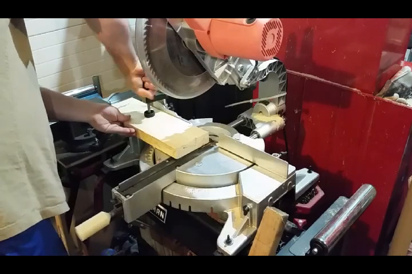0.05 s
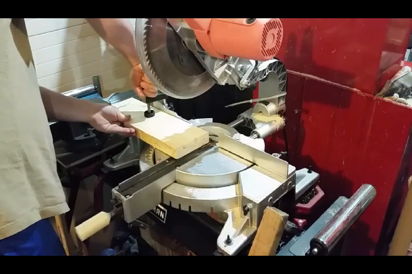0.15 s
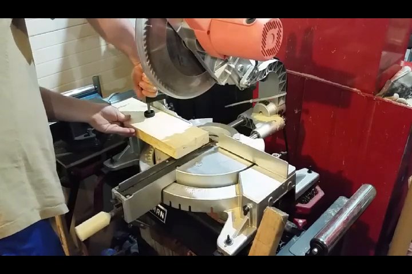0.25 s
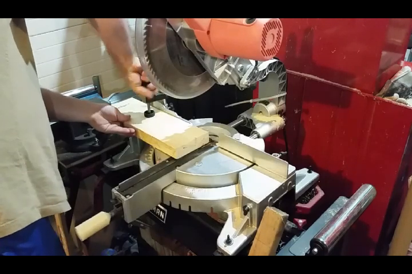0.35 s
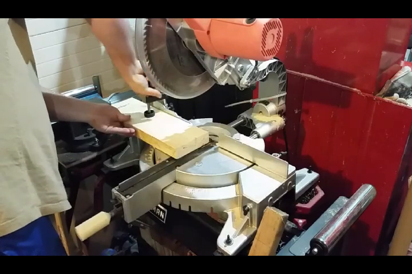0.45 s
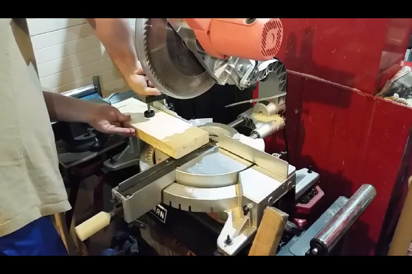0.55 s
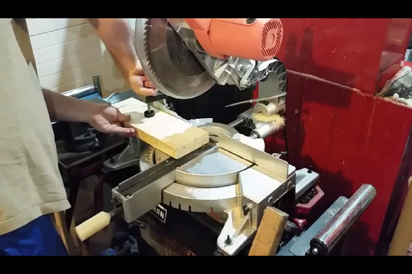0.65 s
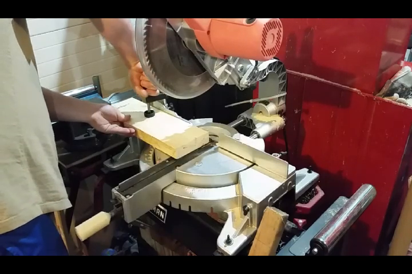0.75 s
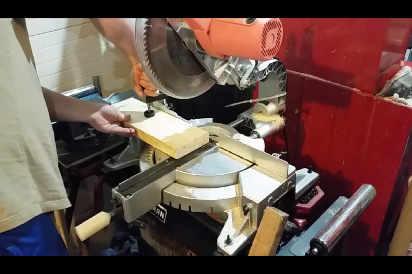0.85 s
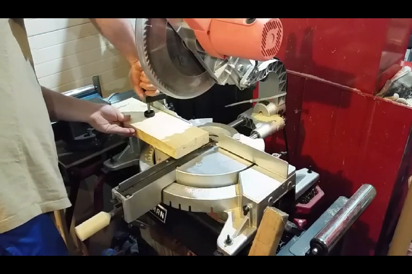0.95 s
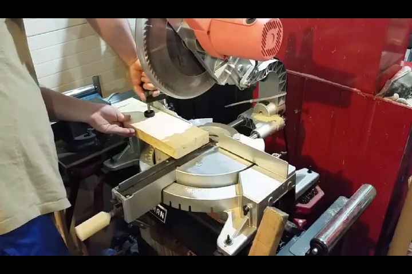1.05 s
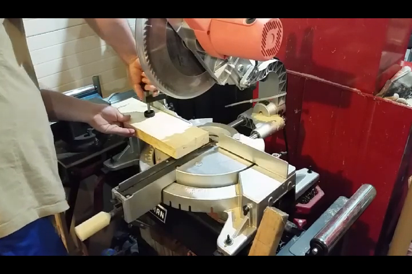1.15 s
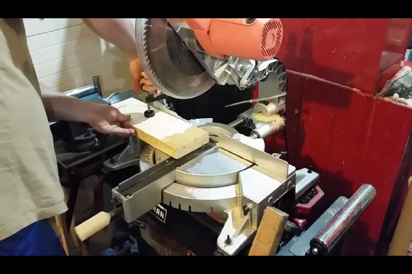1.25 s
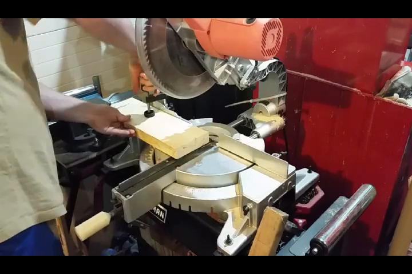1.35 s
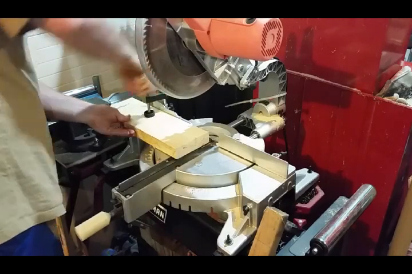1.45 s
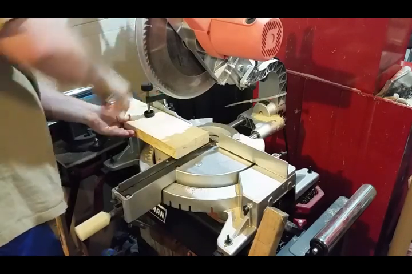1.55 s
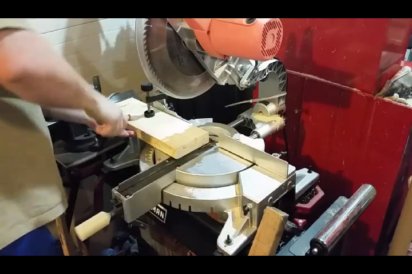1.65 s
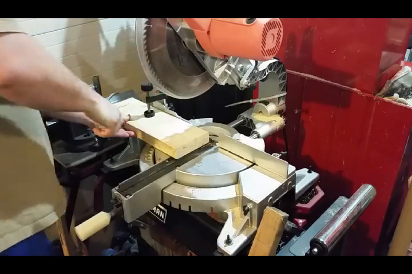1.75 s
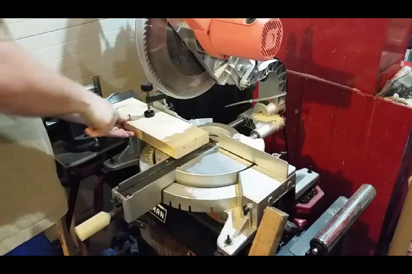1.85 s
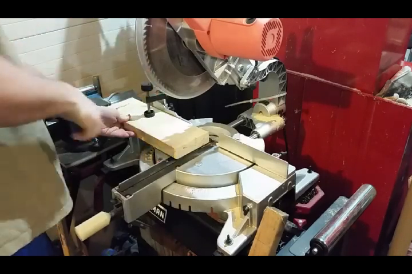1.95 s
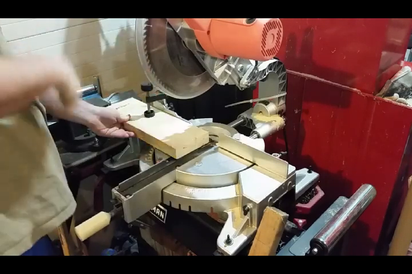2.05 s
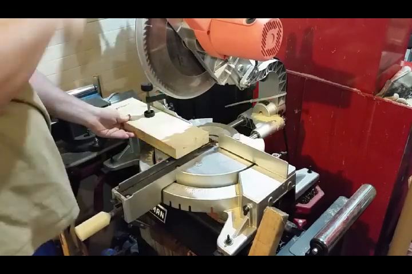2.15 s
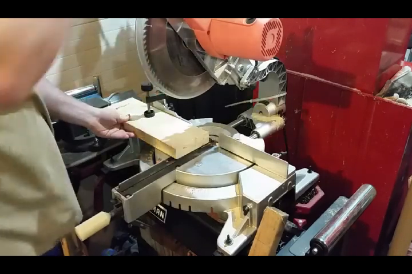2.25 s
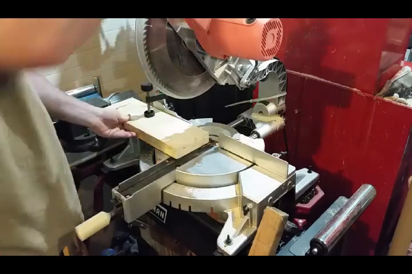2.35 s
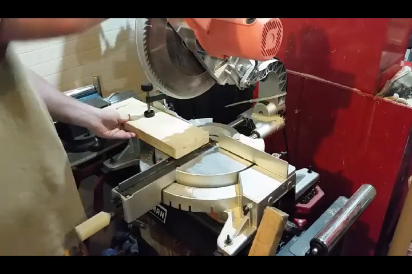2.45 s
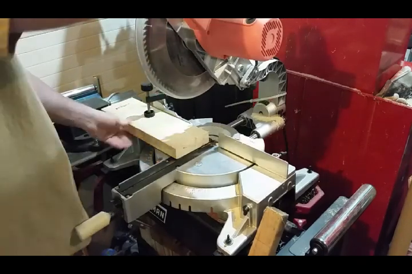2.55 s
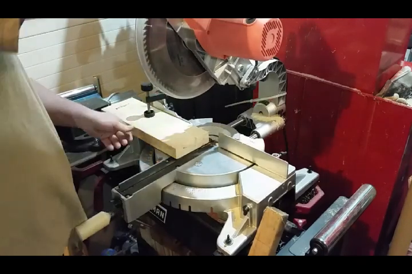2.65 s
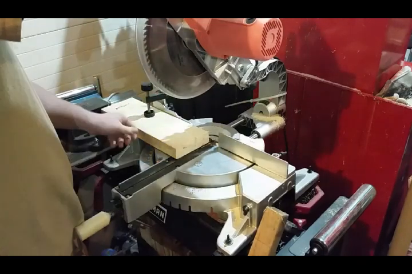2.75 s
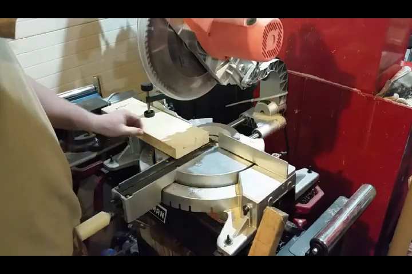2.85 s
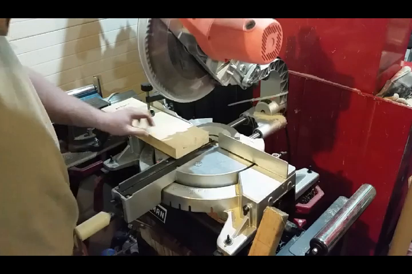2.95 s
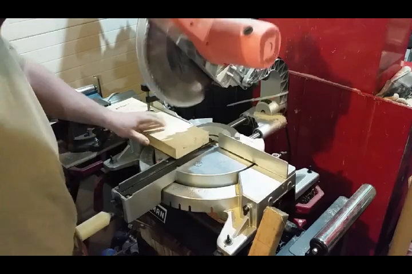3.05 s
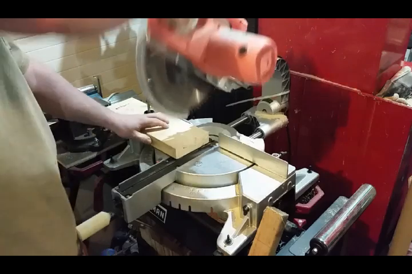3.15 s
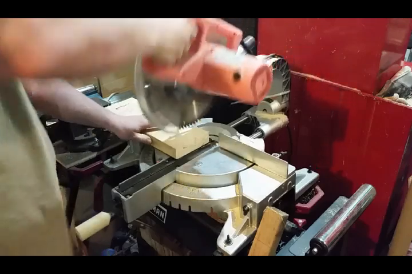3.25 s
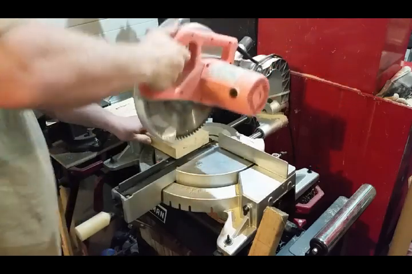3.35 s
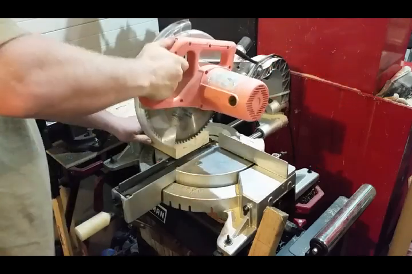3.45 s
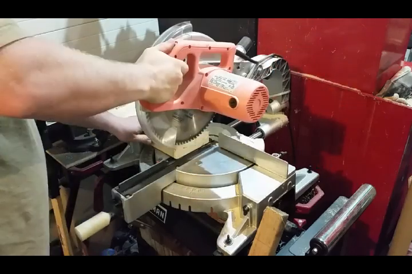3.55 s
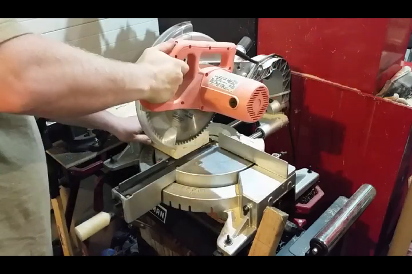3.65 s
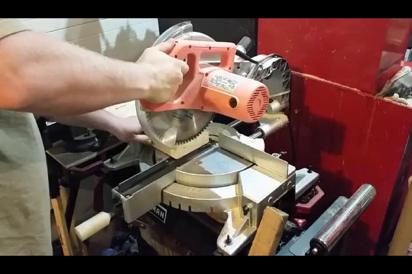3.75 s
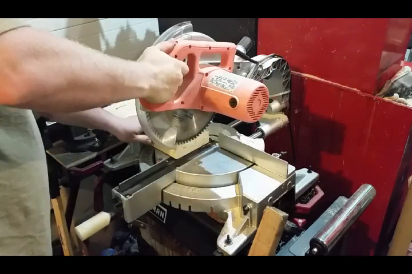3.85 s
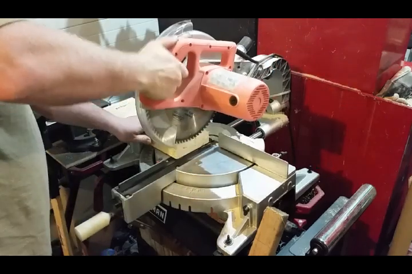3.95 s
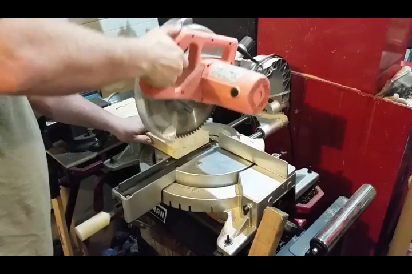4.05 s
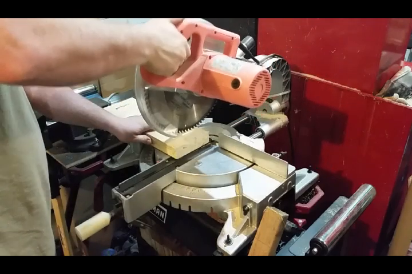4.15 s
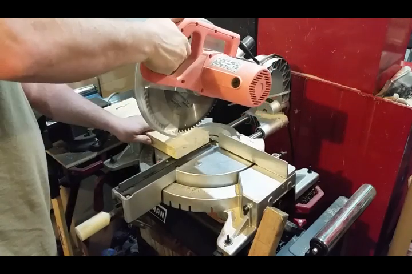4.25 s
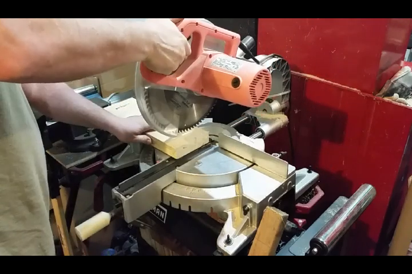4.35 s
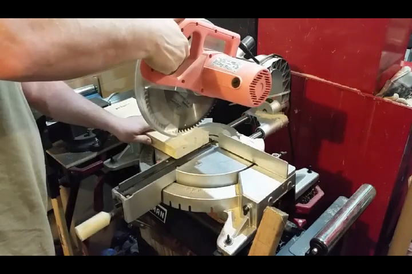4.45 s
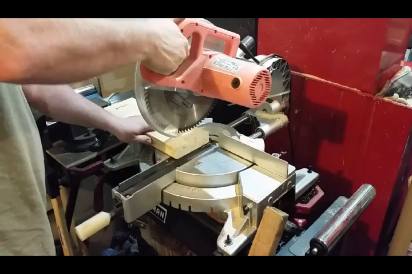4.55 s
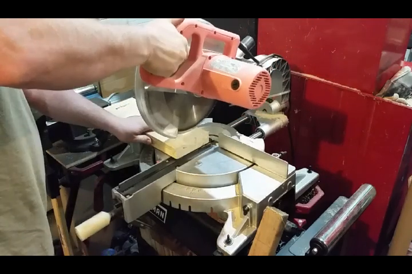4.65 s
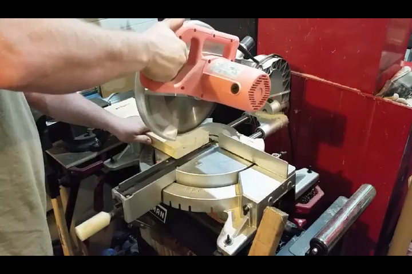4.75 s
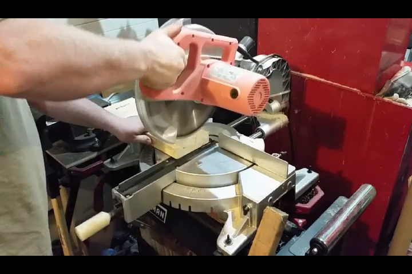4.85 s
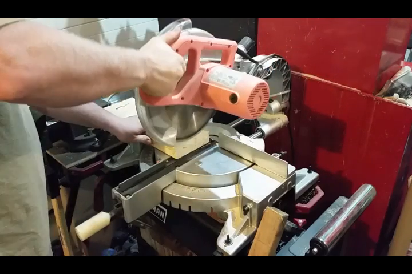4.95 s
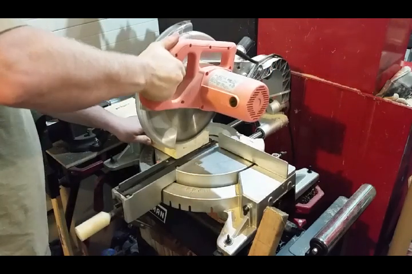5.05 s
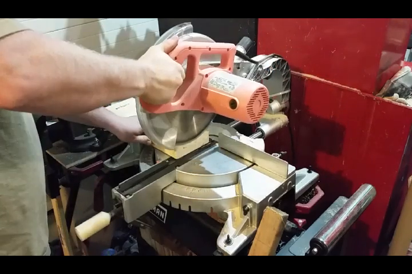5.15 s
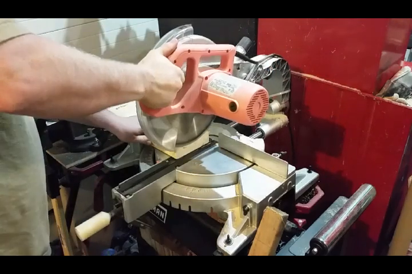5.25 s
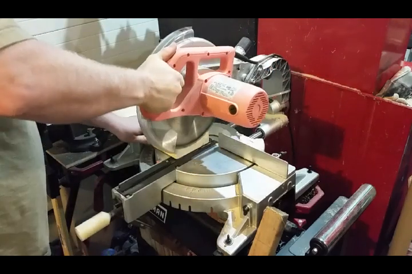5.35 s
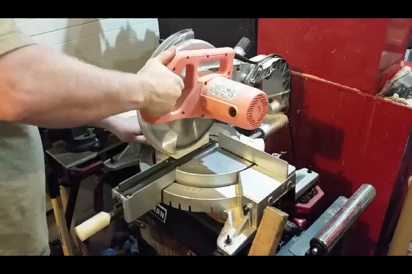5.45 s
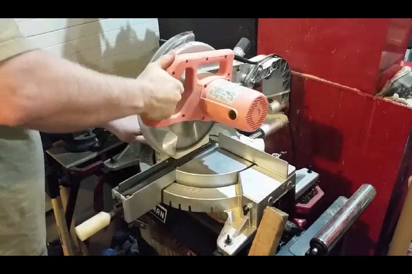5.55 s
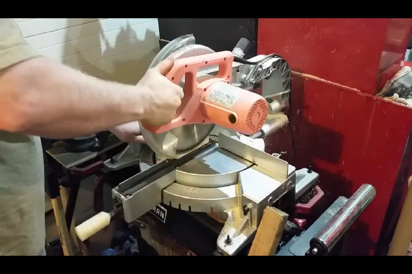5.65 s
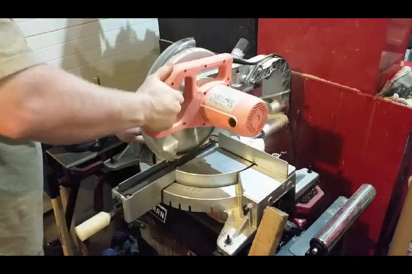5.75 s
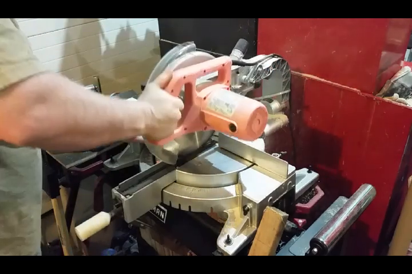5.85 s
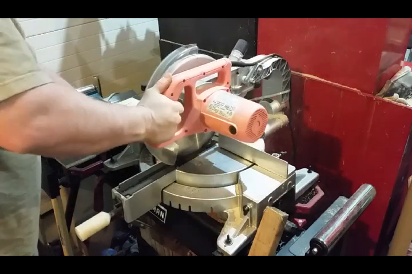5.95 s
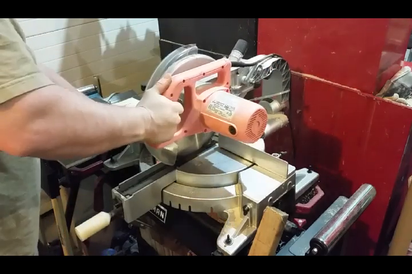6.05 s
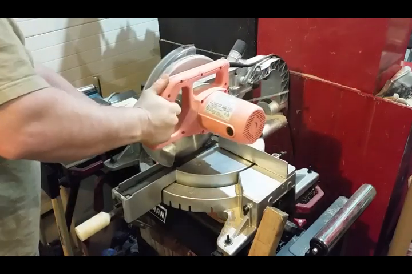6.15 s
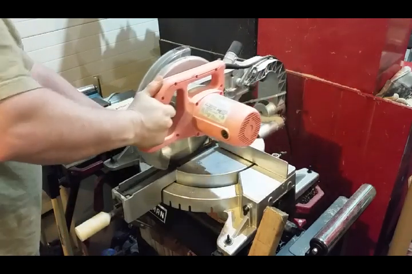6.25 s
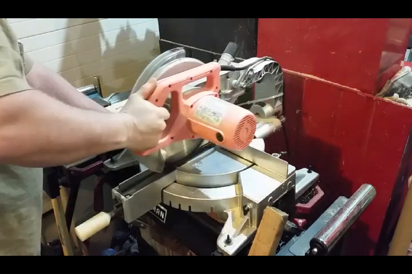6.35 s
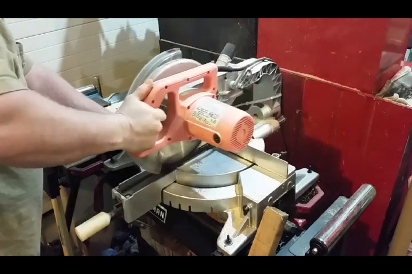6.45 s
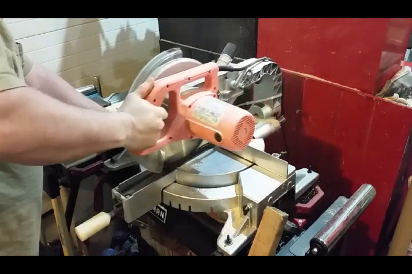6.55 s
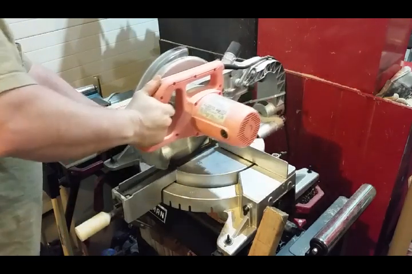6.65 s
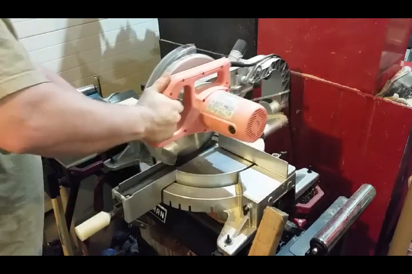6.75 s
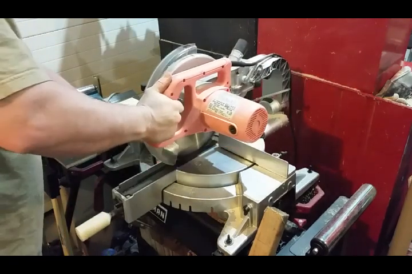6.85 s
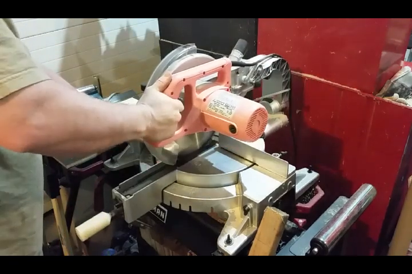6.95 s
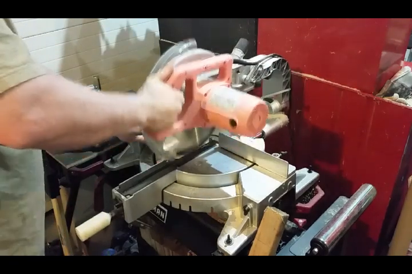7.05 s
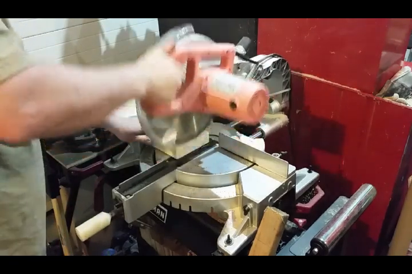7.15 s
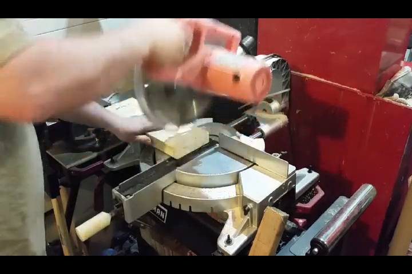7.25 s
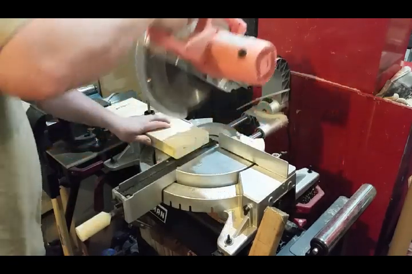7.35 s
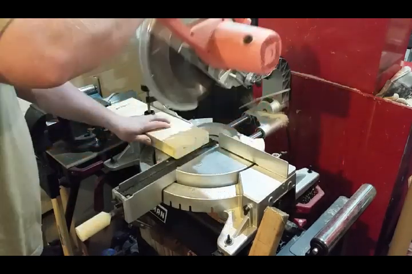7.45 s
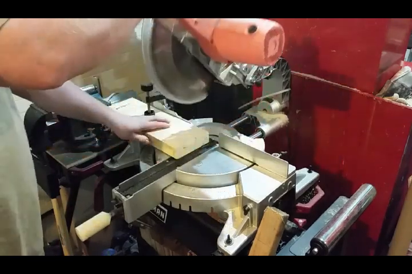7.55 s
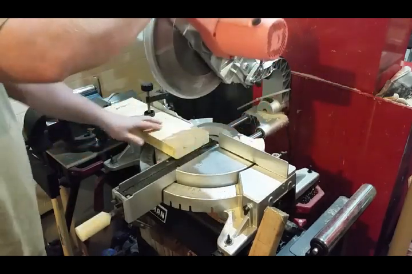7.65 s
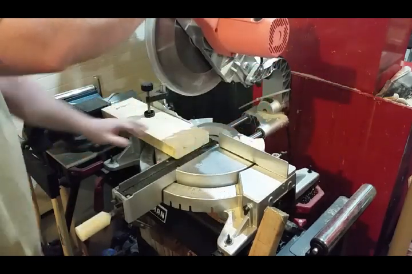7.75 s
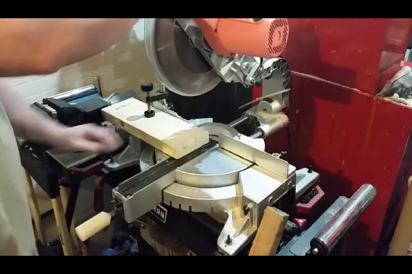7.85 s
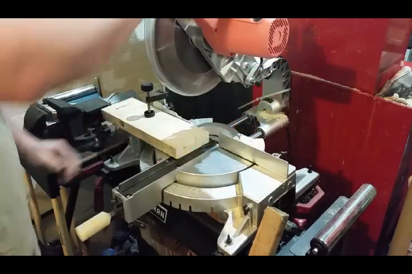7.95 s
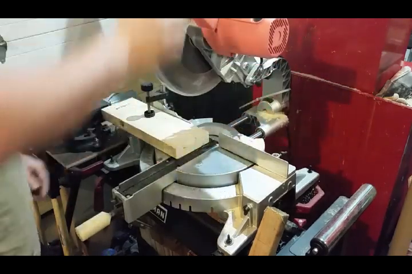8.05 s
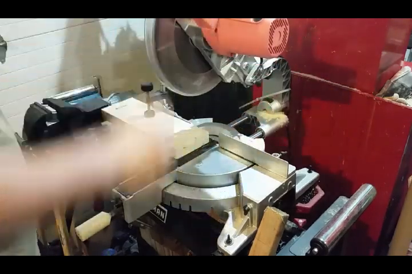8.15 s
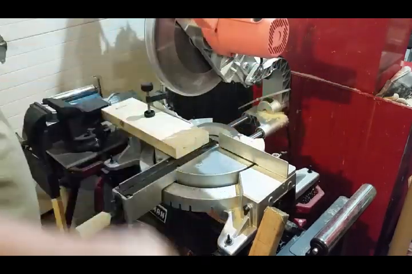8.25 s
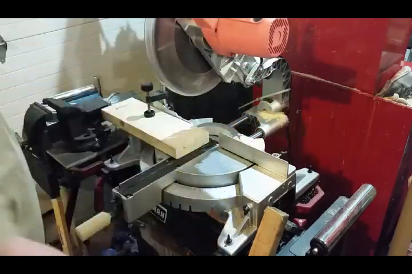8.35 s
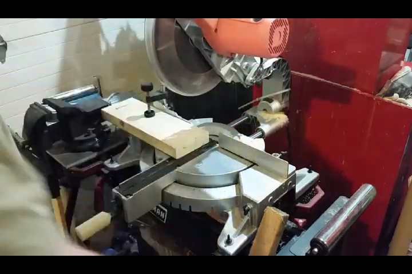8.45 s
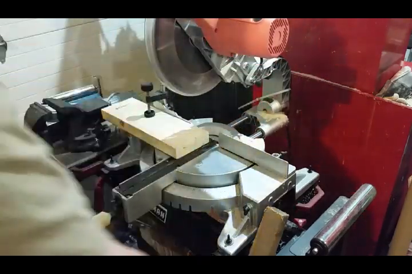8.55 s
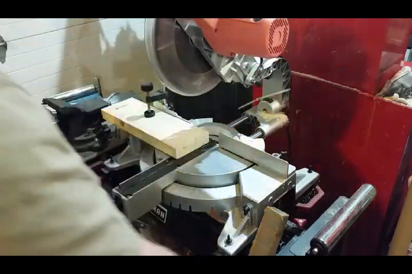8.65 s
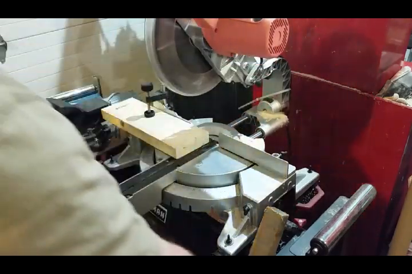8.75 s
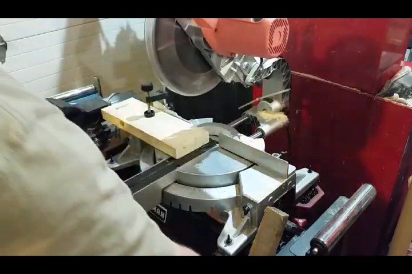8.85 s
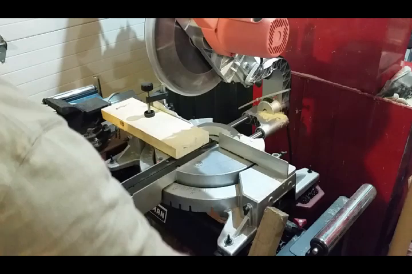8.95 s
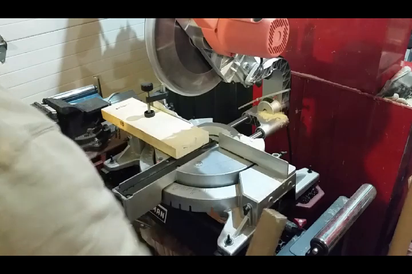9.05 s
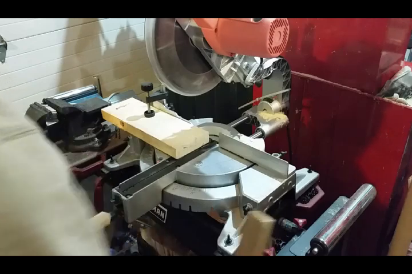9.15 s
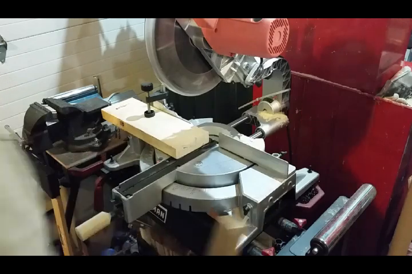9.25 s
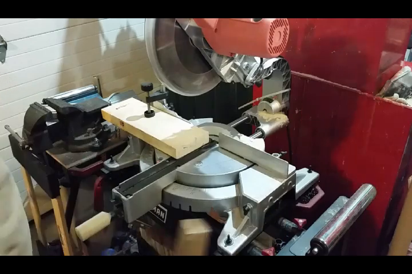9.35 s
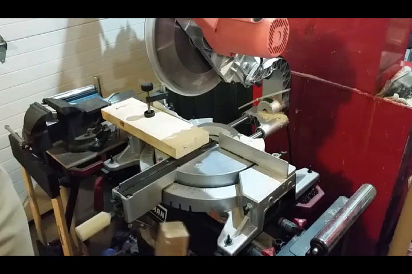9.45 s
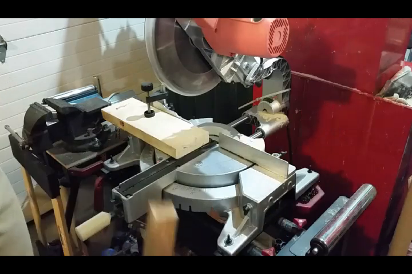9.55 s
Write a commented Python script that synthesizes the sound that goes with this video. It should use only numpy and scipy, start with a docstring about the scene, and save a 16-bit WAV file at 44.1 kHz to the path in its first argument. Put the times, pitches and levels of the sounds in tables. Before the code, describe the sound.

In a quiet small workshop, a sharp clack is followed by soft clicks and rubbing as a miter saw's arm is lowered. The motor jolts on and whines up with rushing air. The blade cuts a wooden board in two pushes, hissing and briefly ringing. Switched off, the saw gives one knock and winds down with a falling whine and slowing rattle, heard from nearby.

```python
"""Miter saw in a small workshop.

A board shifts, a clack sounds, then the sprung arm swings down and eases back, clicking and rubbing.
The motor jolts on and spins up; its speed drives gear whine, howl, rattle and rushing air.
The blade grazes the wood, cuts in two pushes and grazes it again: chips hiss, tips and plate ring.
Switched off, the gears sing a falling whine and rattle ever more slowly in their housing."""
import sys
import numpy as np
from scipy import signal
from scipy.fft import rfft, irfft, next_fast_len
from scipy.io import wavfile
from scipy.ndimage import uniform_filter1d

SR = 44100
rng = np.random.default_rng(int(sys.argv[2]) if len(sys.argv) > 2 else 0)


def transcribe(u):
    """Save the signal u as a 16-bit wav file named by the first command-line argument.

    u: samples, shape (n,) or (channels, n), limited to [-1, 1]; the rate is SR.
    q: integer samples, one column per channel.
    """
    v = np.clip(np.atleast_2d(u).T, -1, 1)
    q = np.round(v * 32767).astype(np.int16)
    wavfile.write(sys.argv[1], SR, q)


N = 422841
T = np.arange(N) / SR
HZ = np.fft.rfftfreq(N, 1 / SR)
ON_S, OFF_S = 4.686, 7.391  # trigger pulled, released
TOP_HZ = 2795  # tooth rate the gears tend to under power


def amp(db):
    """Decibels to gain."""
    return 10 ** (np.asarray(db) / 20)


def unit(x):
    """Scale to rms 1."""
    return x / np.sqrt(np.mean(x ** 2) + 1e-20)


def curve_at(points, hz):
    """Interpolate (Hz, value) points over log frequency."""
    point_hz, value = np.transpose(points)
    return np.interp(np.log(hz + 1), np.log(point_hz + 1), value)


# Bands that set the noise level of rattle, air and chips. Each row: low edge in Hz, high edge in Hz.
LEVEL_BANDS = [(280, 520), (4000, 9000), (11500, 14500)]
RATTLE_BAND, AIR_BAND, CHIP_BAND = LEVEL_BANDS

def noise(spectrum, band_hz=(0, SR)):
    """Coloured noise with rms 1 inside the band."""
    bins = rfft(rng.standard_normal(N)) * amp(curve_at(spectrum, HZ))
    in_band = (HZ >= band_hz[0]) * (HZ <= band_hz[1])
    return irfft(bins, N) / np.std(irfft(bins * in_band, N))


def drift(hz):
    """Smooth random motion of rms 1, up to about hz."""
    return unit(irfft(rfft(rng.standard_normal(N)) / (1 + (HZ / hz) ** 4), N))


def stroke(start_s, end_s, db, rise_db_per_s, fall_db_per_s):
    """Envelope that holds db from start to end and slopes away on both sides."""
    drop_db = rise_db_per_s * np.maximum(start_s - T, 0) + fall_db_per_s * np.maximum(T - end_s, 0)
    return amp(db - np.minimum(drop_db, 200))


def decays(blows, t60_s):
    """Envelope of dying blows, summed in power."""
    return np.sqrt(sum((T >= s) * amp(db - 60 * np.maximum(T - s, 0) / t60_s) ** 2 for s, db in blows))


# Background spectrum. Each row: frequency in Hz, relative density in dB.
ROOM_SPECTRUM = [(25, -4), (58, -8), (95, -9), (155, -1), (180, -10), (260, -15), (700, -27), (3400, -46.5),
                 (5000, -29), (6300, -51.5)]

def room_tone(level_db=-66.5):
    """Faint, steady, mostly low noise."""
    return amp(level_db) * noise(ROOM_SPECTRUM)


# Gear housing resonances. Each row: centre in Hz, width in Hz, lift in dB.
HOUSING_MODES = [(370.46, 59.5, 13), (810.5, 63.6, 9.5), (1410.7, 33, 8), (2425, 90, 10.5), (2982, 103, 8),
                 (4110, 40, 8), (6320, 1368, 10)]

def housing(x):
    """The cast housing lifts whatever falls on its resonances."""
    size = next_fast_len(N + SR)
    bin_hz = np.fft.rfftfreq(size, 1 / SR)
    lift = sum((amp(db) - 1) / (1 + 2j * (bin_hz - hz) / width_hz) for hz, width_hz, db in HOUSING_MODES)
    return irfft(rfft(x, size) * (1 + lift), size)[:N]


# Friction spectra by direction. Each row: frequency in Hz, relative density in dB.
RUB_DOWN_SPECTRUM = [(40, -7.5), (180, -1), (260, -5), (600, -9.5), (1150, -1.5), (2500, -12),
                     (3500, -15.5), (6200, -29.5), (9500, -43), (14000, -28.5)]
RUB_UP_SPECTRUM = [(240, -12.5), (640, -17), (1440, -1), (1960, -8), (2740, -4.5), (5200, -23),
                   (9700, -45.5), (14500, -39)]
# Board and arm moves. Each row: start in seconds, end in seconds, relative level in dB,
# rise in dB/s, fall in dB/s, direction.
RUB_STROKES = [(0.298, 0.513, -74.5, 87.5, 190, "down"), (2.934, 2.98, -68, 114.5, 203.5, "down"),
               (2.989, 3.805, -46.5, 1500, 230, "down"), (3.254, 3.298, -32, 114, 67.5, "down"),
               (4.22, 4.288, -36.5, 179.5, 288.5, "up")]

def rubs(gain_db=-3.0, grain_db=1.4):
    """The board shifts, the arm is lowered and eased back; friction sounds through the housing."""
    friction = {"down": unit(housing(noise(RUB_DOWN_SPECTRUM))),
                "up": unit(housing(noise(RUB_UP_SPECTRUM)))}
    rubbing = sum(stroke(*shape) * friction[direction] for *shape, direction in RUB_STROKES)
    return rubbing * amp(gain_db + grain_db * drift(104))


# Clack blows. Each row: start in seconds, level in dB.
CLACK_BLOWS = [(.8845, -33.5), (.902, -37)]
# Clack spectrum. Each row: frequency in Hz, relative density in dB.
CLACK_SPECTRUM = [(150, -23.5), (500, -1), (900, 2.5), (1950, -8), (4600, -4.5), (5680, 2.5), (7000, -9),
                  (14500, -11)]

def clack():
    """Two blows in quick succession, heard as one sharp clack."""
    return decays(CLACK_BLOWS, t60_s=0.307) * noise(CLACK_SPECTRUM)


# Guard clicks and knocks. Each row: start in seconds, relative level in dB.
GUARD_BLOWS = [(2.993, -39), (3.04, -40.5), (3.575, -36.5), (3.672, -36.5), (3.719, -34.5), (3.982, -56),
               (4.095, -57), (4.115, -51), (7.8, -14)]
# Click spectrum. Each row: frequency in Hz, relative density in dB.
CLICK_SPECTRUM = [(40, -40), (150, -18), (400, -6), (1250, 2), (4000, -13.5), (14000, -35)]

def guard_clicks():
    """The guard and its linkage knock, ringing the housing."""
    return housing(decays(GUARD_BLOWS, t60_s=0.0317) * noise(CLICK_SPECTRUM))


# Mains hum partials. Each row: frequency in Hz, relative level in dB.
HUM_PARTIALS = [(120, 8.5), (360, 8.5), (600, -15.5)]
# Starting jolt spectrum. Each row: frequency in Hz, relative density in dB.
JOLT_SPECTRUM = [(30, -40.5), (70, -11.5), (220, -7), (350, -4), (1500, -5), (1950, -10), (2450, -3.5),
                 (3100, -34.5), (14000, -31)]

def inrush(buzz_depth=0.19, attack_s=0.0228, hold_s=0.215, jolt_db=-24.5, hum_db=-26,
           jolt_fall_db_per_s=28, hum_fall_db_per_s=38):
    """Starting current shakes the saw at twice the mains frequency, holds briefly and falls away."""
    hum = unit(sum(amp(db) * np.sin(2 * np.pi * (hz * T + rng.random())) for hz, db in HUM_PARTIALS))
    buzz_hz = HUM_PARTIALS[0][0]
    jolt = noise(JOLT_SPECTRUM) * (1 + buzz_depth * np.sin(2 * np.pi * buzz_hz * T))
    falling_s = np.maximum(T - ON_S - hold_s, 0)
    jolt *= amp(jolt_db - jolt_fall_db_per_s * falling_s)
    hum *= amp(hum_db - hum_fall_db_per_s * falling_s)
    return np.clip((T - ON_S) / attack_s, 0, 1) * (jolt + hum)


def powered(switch_s=0.012):
    """1 while the trigger is held, else 0, with short ramps."""
    return np.clip((T - ON_S) / switch_s, 0, 1) * np.clip((OFF_S - T) / switch_s + 1, 0, 1)


def tooth_rate_hz(half_speed_s=0.34, sag=0.2, inertia_s=0.8, friction_s=2.697, drag_hz=679.35):
    """The motor spins up and sags under load; once off, friction and, above drag_hz, mainly air brake it."""
    run_s = np.clip(T - ON_S, 1e-3, OFF_S - ON_S)
    pole = np.exp(-1 / (inertia_s * SR))
    lagged_bite = signal.lfilter([1 - pole], [1, -pole], bite())
    load = np.interp(ON_S + run_s, T, lagged_bite)
    driven_hz = TOP_HZ * run_s / (run_s + half_speed_s) * (1 - sag * load)
    slowing = np.exp(np.maximum(T - OFF_S, 0) / friction_s)
    return 1 / ((1 / driven_hz + 1 / drag_hz) * slowing - 1 / drag_hz)


def torque(tooth_hz):
    """0 to 1: the motor pulls hardest at rest and eases toward top speed."""
    return powered() * (1 - tooth_hz / TOP_HZ)


# Gear mesh partials. Each row: multiple of the tooth rate, relative level in dB.
MESH_PARTIALS = [(1, 0.5), (2, 0), (3, -2.5), (4, 3), (5, -4.5), (6, -12), (8, -12.5)]

def gear_whine(tooth_hz, pinion_teeth=7, flutter=0.004, roughness=0.45, swell_db=0.6, runout=0.6,
               shaft_db=-20, cutoff_hz=92, gain_db=-5.5):
    """Teeth mesh, soft under power, loud when coasting; the off-centre pinion adds side tones and hum."""
    phase = 2 * np.pi * np.cumsum(tooth_hz * (1 + flutter * drift(67.7))) / SR
    shaft = np.cos(phase / pinion_teeth)
    radiated = 1 / np.sqrt(1 + (cutoff_hz * pinion_teeth / tooth_hz) ** 8)  # small body, little bass
    mesh = sum(amp(db + swell_db * drift(5)) * (1 + roughness * drift(37.5)) * np.cos(k * phase)
               for k, db in MESH_PARTIALS)
    whine = unit(mesh * (1 + runout * shaft) + amp(shaft_db) * radiated * shaft)
    coasting = (T > OFF_S) * (1 - powered())
    envelope = amp(-27) * powered() + amp(-8.8) * coasting * (tooth_hz / TOP_HZ) ** 0.88
    return amp(gain_db) * envelope * whine


# Gear knock spectrum. Each row: frequency in Hz, relative density in dB.
RATTLE_SPECTRUM = [(40, -42.5), (150, -5.5), (230, -34), (340, 3.5), (600, 0.5), (1200, 2), (2200, -5.5),
                   (4000, -12), (14000, -48.5)]

def gear_rattle(tooth_hz, teeth_per_knock=12, knock_s=0.0153, uneven_db=3.4, steady_share=0.2,
                loose_hz=520, gain_db=-9):
    """Gears knock across their play: a blur at speed, separate knocks as they slow and shake loose."""
    count = np.floor(np.cumsum(tooth_hz) / SR / teeth_per_knock)
    knocks = np.diff(count, prepend=0) * amp(uneven_db * np.tanh(rng.standard_normal(N)))
    power = signal.lfilter([1], [1, -np.exp(-2 / (knock_s * SR))], knocks ** 2)
    power /= np.abs(uniform_filter1d(power, SR // 6)) + 1e-6  # same mean power at any knock rate
    pulsing = np.sqrt(steady_share + (1 - steady_share) * power)
    looseness = 1 / (1 + (tooth_hz / loose_hz) ** 16)
    envelope = amp(-27.5) * powered() + (T > OFF_S) * (amp(-36) + amp(-24.5) * looseness)
    return amp(gain_db) * envelope * pulsing * noise(RATTLE_SPECTRUM, RATTLE_BAND)


def gear_howl(tooth_hz, width_hz=125, throb_depth=0.645, teeth_per_turn=48, octave_db=-8.5, gain_db=24.5):
    """Driven teeth chatter: noise bands at the tooth rate and its octave, throbbing once a blade turn."""
    phase = 2 * np.pi * np.cumsum(tooth_hz) / SR
    first, octave = (unit(drift(width_hz) * np.cos(k * phase) + drift(width_hz) * np.sin(k * phase))
                     for k in (1, 2))
    throb = 1 + throb_depth * np.cos(phase / teeth_per_turn)
    envelope = (tooth_hz / TOP_HZ) ** 4 * torque(tooth_hz) ** 3.1
    return amp(gain_db) * envelope * throb * (first + amp(octave_db) * octave)


# Blade and fan air spectrum. Each row: frequency in Hz, relative density in dB.
AIR_SPECTRUM = [(30, -63.5), (150, -20.5), (320, 1.5), (1000, 1.5), (4500, 0.5), (6700, 2), (7700, -8),
                (9500, -7), (10600, -12.5), (12000, -9), (14500, -7.5)]

def air_rush(tooth_hz, gain_db=-22.1, strain_db=7.5, build_s=0.267, flicker_db=2.5):
    """Air torn by blade and cooling fan grows with speed; brush hiss adds to it while the motor strains."""
    flow = np.clip((T - ON_S) / build_s, 0, 1) * (tooth_hz / TOP_HZ) ** 0.67
    hiss = noise(AIR_SPECTRUM, AIR_BAND)
    return flow * hiss * amp(gain_db + strain_db * torque(tooth_hz) + flicker_db * drift(62.2))


# Blade contacts with the wood. Each row: start in seconds, end in seconds, relative strength in dB.
BLADE_PUSHES = [(5.24, 5.33, -3.5), (5.47, 5.9, -6), (6.37, 6.76, -11.5), (7.26, 7.295, -9)]

def bite():
    """How hard the teeth are in the wood; 0 in free air."""
    return sum(stroke(*push, rise_db_per_s=330, fall_db_per_s=130) for push in BLADE_PUSHES)


# Chip hiss spectrum. Each row: frequency in Hz, relative density in dB.
CHIP_SPECTRUM = [(300, -100), (1500, -9.5), (8500, -2.5), (10000, -6.5), (11300, -5.5), (12800, 5.5),
                 (14500, -3)]
# Tooth tip modes. Each row: frequency in Hz, relative level in dB.
TIP_MODES = [(11434, 0.5), (12107, -17), (12834, -4), (13857, -6), (14212, 8.5)]

def cutting(tooth_hz, chips_db=-7.5, tips_db=-8, grain_db=3.3, uneven_db=0.8, tip_half_width_hz=104):
    """Teeth tear out hissing chips and their tips ring under random blows; both stay faint in free air."""
    tearing = bite() * amp(uneven_db * drift(15.8))
    free_running = amp(-24.5) * (T > ON_S) * tooth_hz / TOP_HZ
    chips = noise(CHIP_SPECTRUM, CHIP_BAND) * amp(chips_db + grain_db * drift(109))
    tip_response = sum(amp(db) / (1 + ((HZ - hz) / tip_half_width_hz) ** 2) for hz, db in TIP_MODES)
    tips = amp(tips_db) * unit(irfft(rfft(rng.standard_normal(N)) * tip_response, N))
    return (tearing + free_running) * (chips + tips)


# Blade plate modes. Each row: frequency in Hz, relative level in dB.
PLATE_MODES = [(782, -13), (1243.6, -0.5), (2664, -6), (3225, 0.5), (3654, -6), (4079, -6), (3886, -4.5),
               (4624, -2.5), (8370, -7)]
# Plate binding. One row: start in seconds, end in seconds, level in dB, rise in dB/s, fall in dB/s.
KERF_RUB = (5.46, 5.77, -11.3, 100, 90)

def plate_song(wobble_depth=0.197, wander_rad=0.673):
    """Rubbing deep in the kerf keeps the steel plate singing, wavering in strength and phase."""
    song = np.zeros(N)
    for hz, db in PLATE_MODES:
        strength = amp(db) * (1 + wobble_depth * drift(29.4))
        song += strength * np.cos(2 * np.pi * hz * T + wander_rad * drift(14.8))
    return stroke(*KERF_RUB) * unit(song)


# Wall reflections. Each row: frequency in Hz, level over the direct sound in dB.
REFLECTION_CURVE = [(100, -4), (350, -5), (1000, -1), (4000, 3.5)]

def workshop(x, t60_s=0.4085):
    """Direct sound plus dense reflections from near walls, different at each microphone."""
    t = T[:SR // 2]
    tail = rng.standard_normal((2, len(t))) * amp(-60 * t / t60_s) * (t > 0.002)
    size = next_fast_len(N + len(t))
    wet = amp(curve_at(REFLECTION_CURVE, np.fft.rfftfreq(size, 1 / SR)))
    echo = rfft(tail / np.linalg.norm(tail, axis=1, keepdims=True), size)
    response = (1 + wet * echo) / np.sqrt(1 + wet ** 2 / 2)
    return irfft(rfft(x, size) * response, size)[:, :N]


def scene(wood_damping=0.9, saw_db=0.5):
    """One speed drives the saw; the wood steadies the blade and quiets the gears; all share the room."""
    tooth_hz = tooth_rate_hz()
    gears = housing(gear_whine(tooth_hz) + gear_rattle(tooth_hz) + gear_howl(tooth_hz))
    gears /= 1 + wood_damping * bite()
    saw = gears + air_rush(tooth_hz) + inrush() + cutting(tooth_hz) + plate_song()
    handling = rubs() + guard_clicks() + clack()
    return workshop(amp(saw_db) * saw + handling + room_tone())


def gain_control(x, threshold_db=-17.5, ratio=4.924, recover_db_per_s=11):
    """Gain drops quickly on loud sound and recovers slowly."""
    power = abs(uniform_filter1d((x ** 2).mean(0), size=1000))
    power_db = 10 * np.log10(power + 1e-12)
    recovery_db = recover_db_per_s * T
    held_db = np.maximum.accumulate(power_db + recovery_db) - recovery_db
    over_db = np.maximum(held_db - threshold_db, 0)
    return x * amp(-(1 - 1 / ratio) * uniform_filter1d(over_db, size=400))


# Microphone port imbalance. Each row: frequency in Hz, left minus right in dB.
PORT_BALANCE = [(100, -1.5), (350, 1.5), (800, 5.5), (2200, 7.5), (4000, 12.5), (5300, 23), (8300, 18),
                (9600, 10.5), (13000, -15)]

def record(dry, cutoff_hz=14650):
    """Two unlike ports, left strong in the upper middle, right at the top; then gain control, low-pass."""
    size = next_fast_len(N + SR)
    tilt = amp(curve_at(PORT_BALANCE, np.fft.rfftfreq(size, 1 / SR)) / 2)
    ports = np.array([tilt, 1 / tilt])
    ports /= np.sqrt((ports ** 2).mean(0))
    picked_up = irfft(rfft(dry, size) * ports, size)[:, :N]
    lowpass = signal.firwin(511, cutoff_hz, window=("kaiser", 9), fs=SR)
    return signal.oaconvolve(gain_control(picked_up), lowpass[None], "same")


dry = scene()
out = record(dry)
transcribe(out)
```